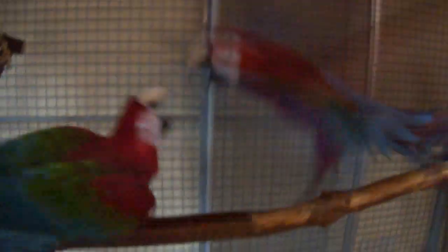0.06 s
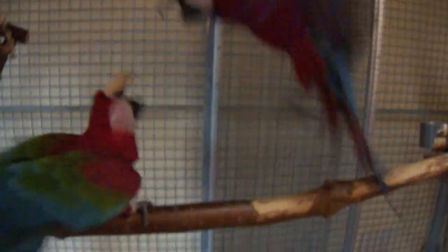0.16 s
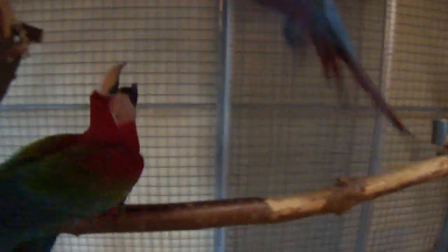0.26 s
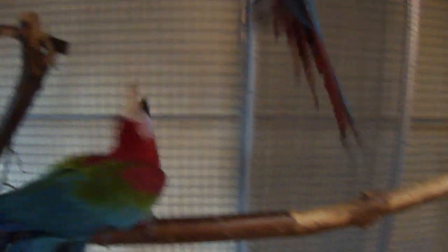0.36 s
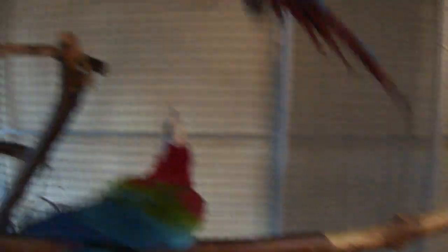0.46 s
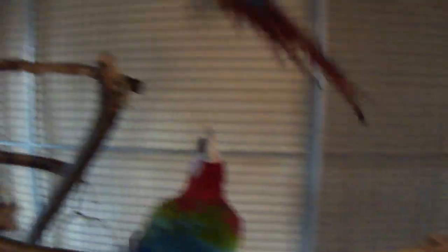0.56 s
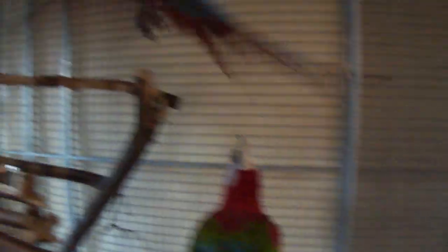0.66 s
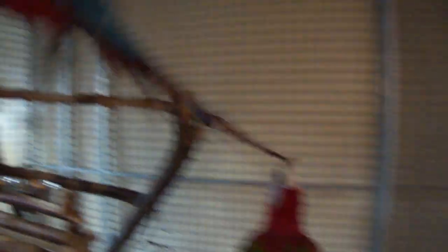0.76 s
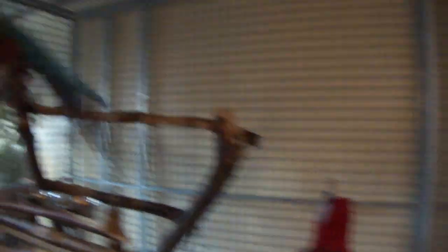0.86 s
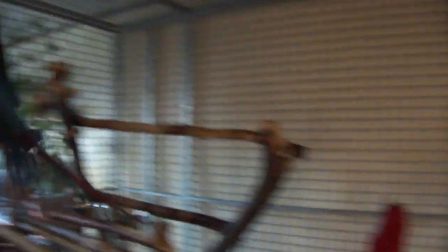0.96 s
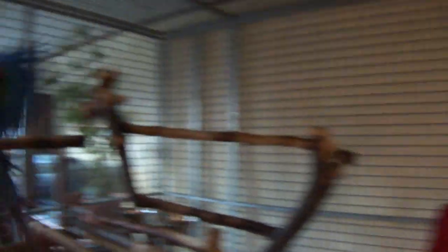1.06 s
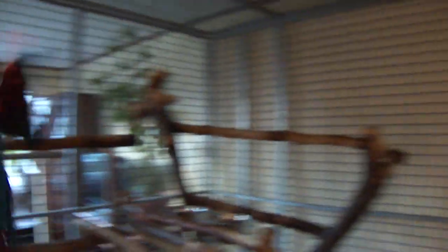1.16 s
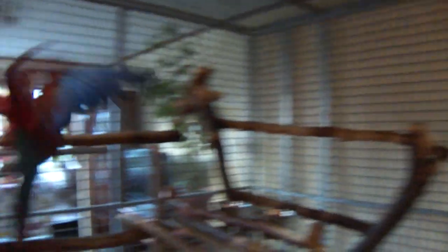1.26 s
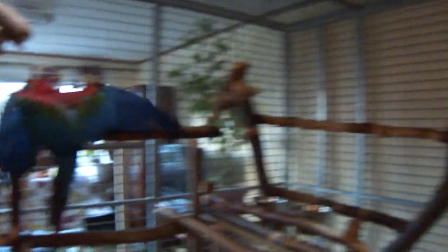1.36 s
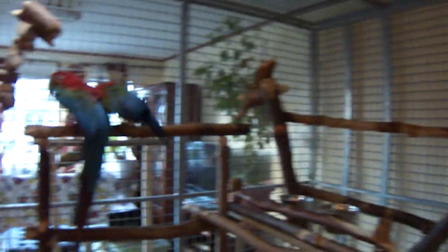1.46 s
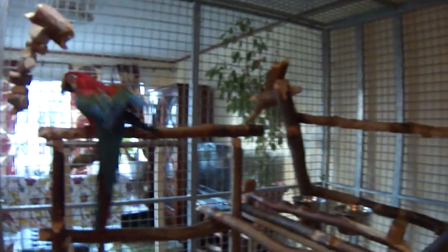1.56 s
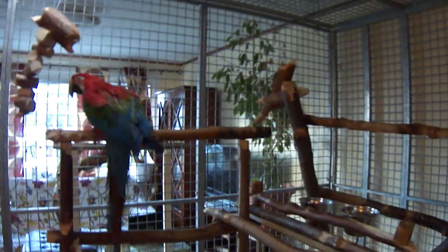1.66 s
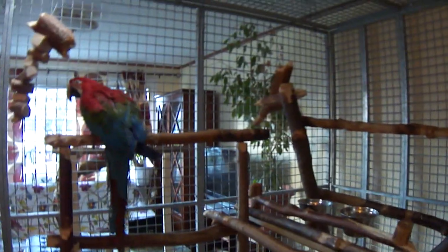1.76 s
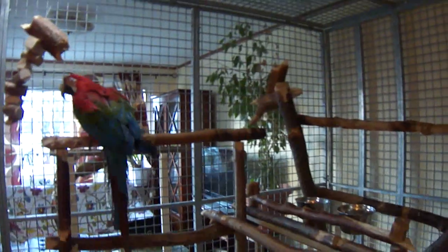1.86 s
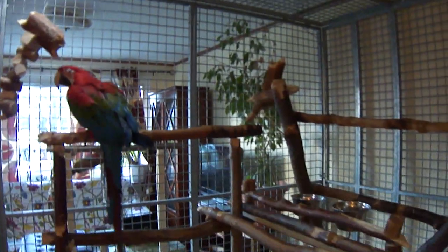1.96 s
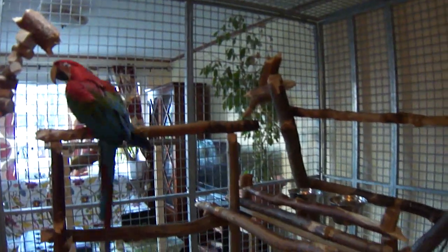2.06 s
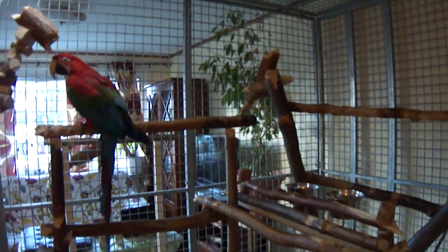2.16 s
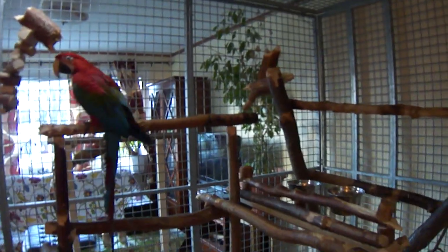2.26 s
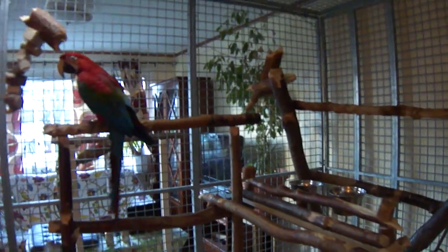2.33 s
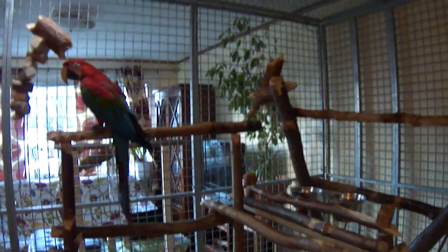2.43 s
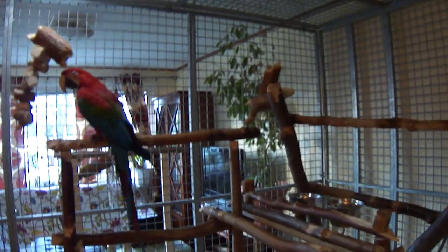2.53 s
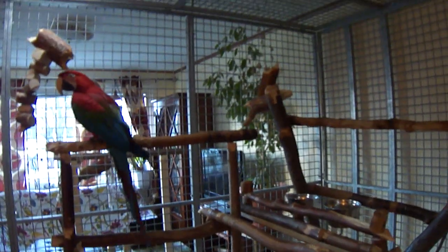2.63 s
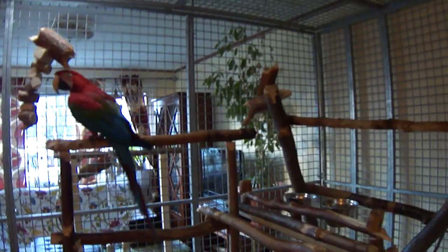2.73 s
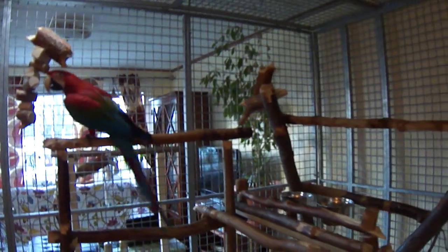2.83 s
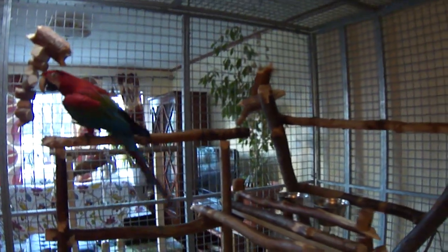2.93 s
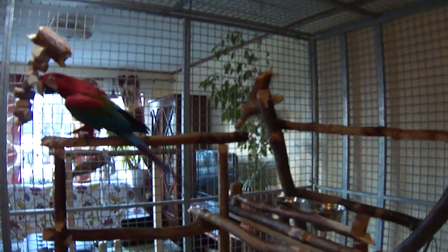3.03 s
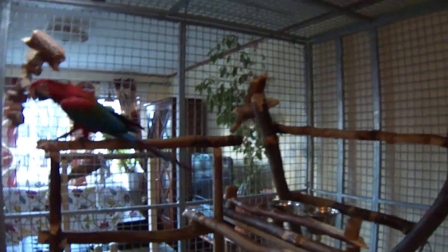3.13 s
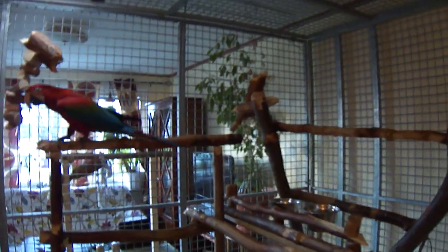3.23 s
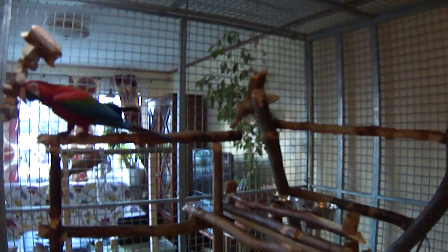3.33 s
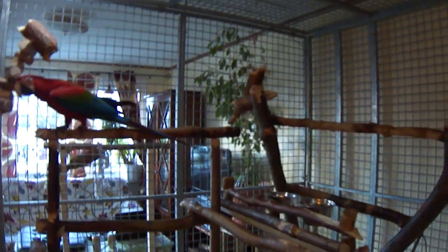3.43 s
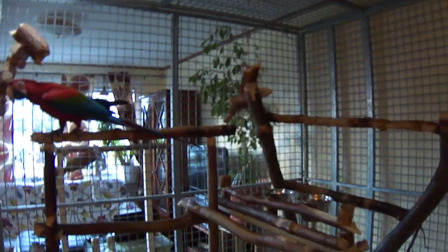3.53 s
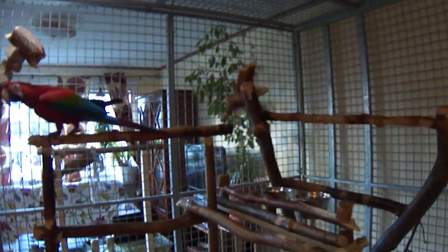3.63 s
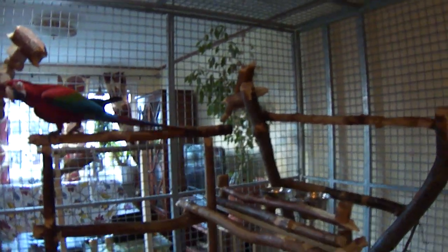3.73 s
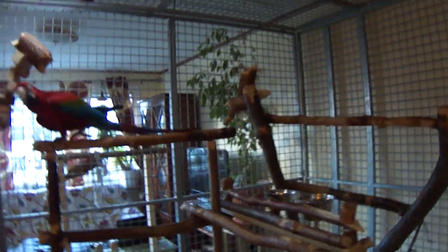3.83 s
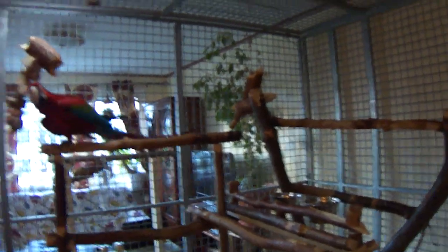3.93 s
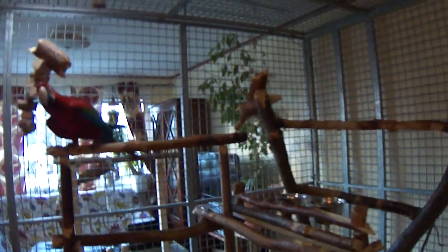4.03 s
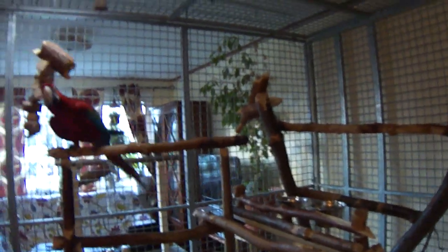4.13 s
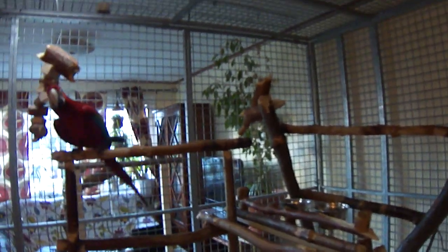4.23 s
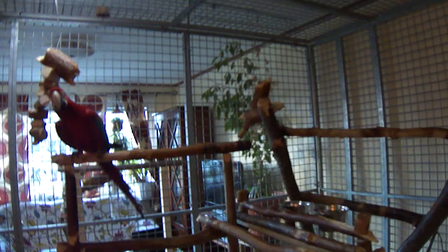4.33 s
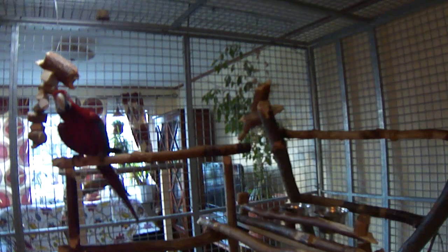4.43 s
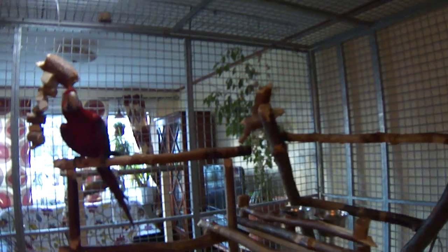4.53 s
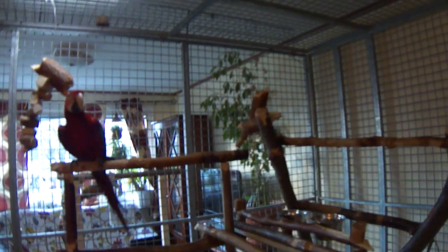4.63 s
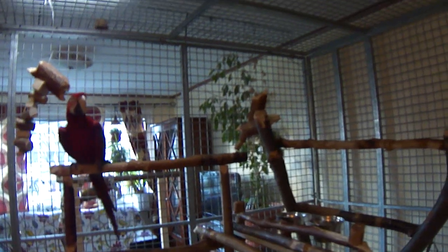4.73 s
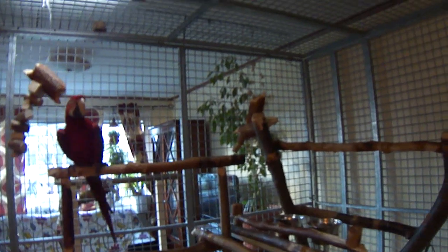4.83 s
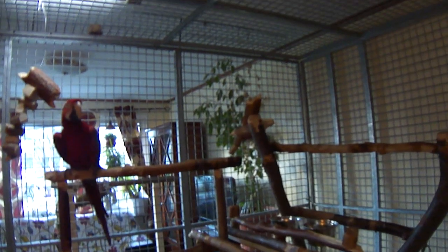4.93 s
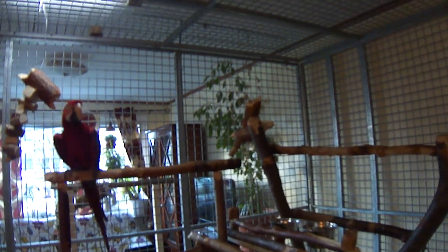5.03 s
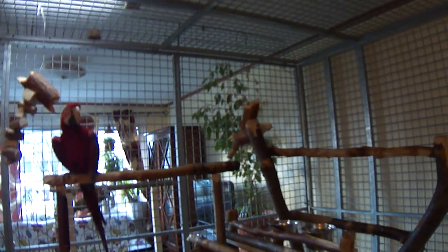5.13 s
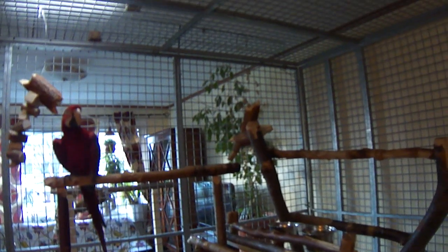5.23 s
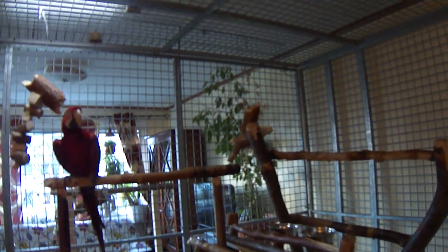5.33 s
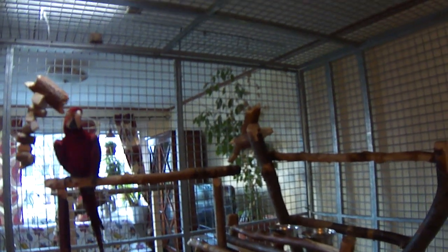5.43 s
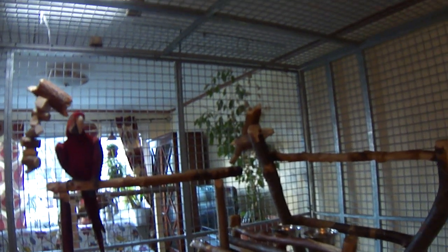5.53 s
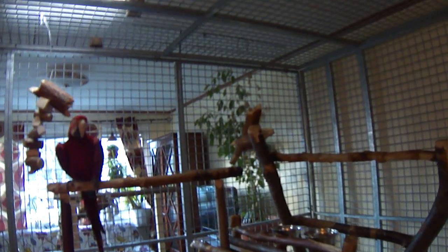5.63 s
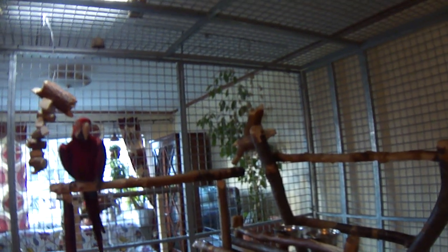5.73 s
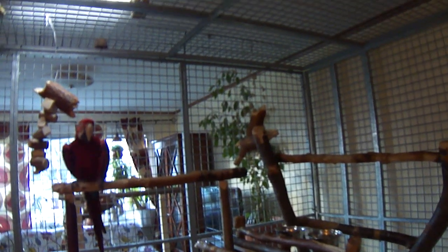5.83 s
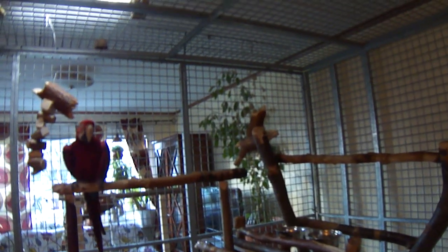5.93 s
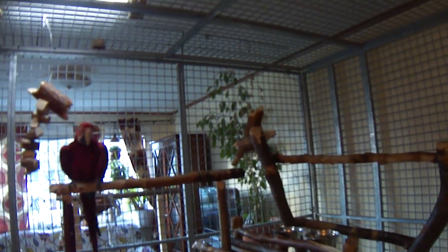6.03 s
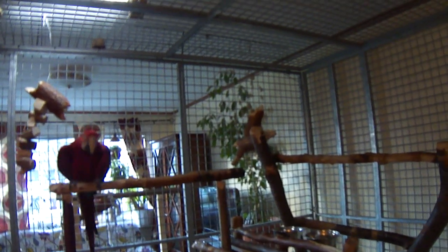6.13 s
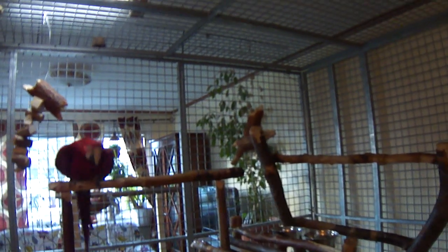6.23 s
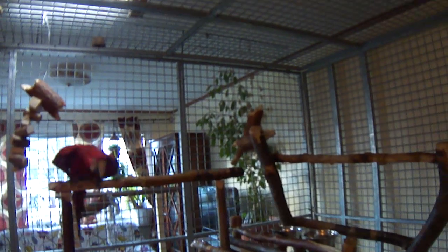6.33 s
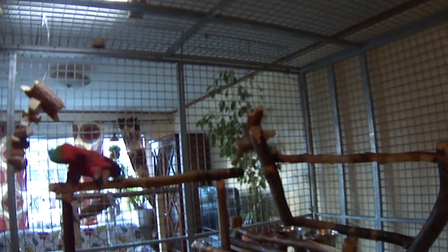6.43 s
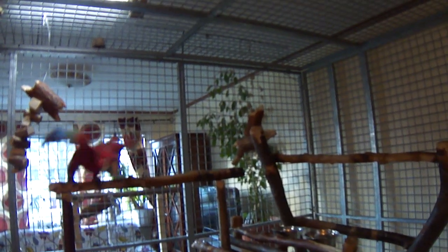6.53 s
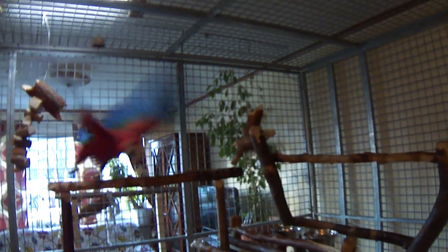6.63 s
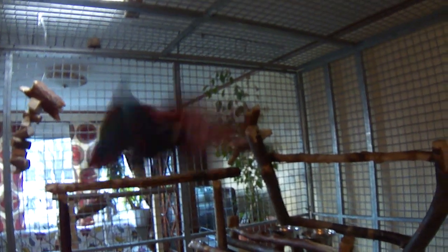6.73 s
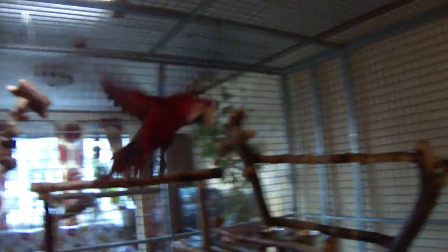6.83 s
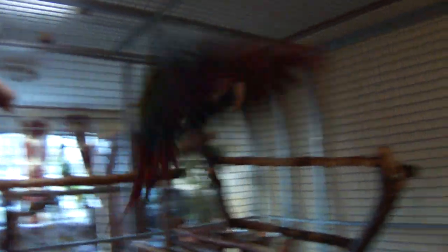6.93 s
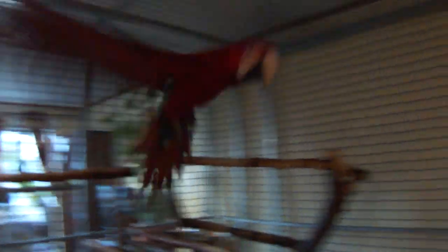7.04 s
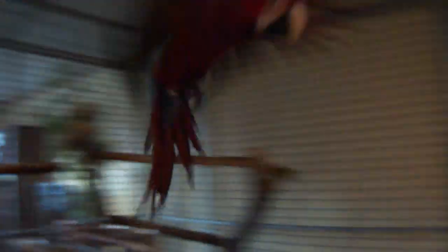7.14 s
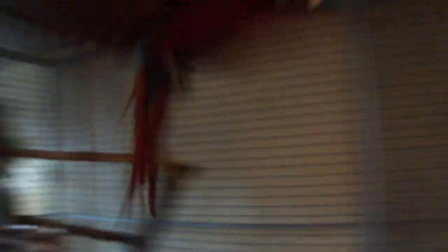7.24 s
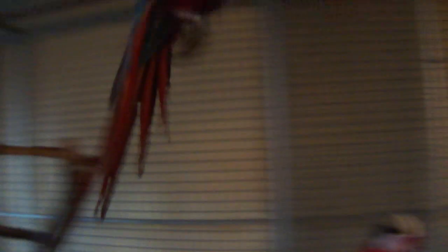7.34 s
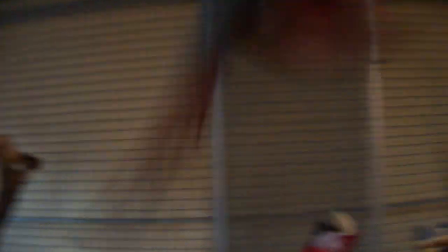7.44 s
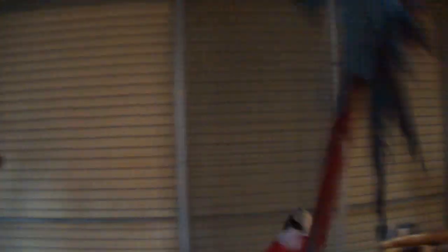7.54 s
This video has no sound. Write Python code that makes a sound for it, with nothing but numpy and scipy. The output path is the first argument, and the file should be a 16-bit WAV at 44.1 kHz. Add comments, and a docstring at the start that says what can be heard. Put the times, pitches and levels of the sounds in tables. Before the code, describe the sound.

In an indoor aviary, heavy feathery wing beats, a knocking landing on wood, sparse taps and faint rustles, then another close, buffeting flight.

```python
"""Parrot flying in an aviary

A large parrot beats its wings close by, lands, scrabbles along wooden perches and flies back.
Wing beats are swells of rushing, hissing noise, with feather snaps and low gusts at the microphone.
Claws and beak are short bursts of clicks that make wood resonate. Room echoes and a steady hush
surround them, and a gain control turns loud peaks down."""
import sys
import numpy as np
from scipy import signal
from scipy.io import wavfile

SR = 44100
rng = np.random.default_rng(int(sys.argv[2]) if len(sys.argv) > 2 else 0)


def file_out(sig):
    """Save sig as 16-bit WAV at sys.argv[1]."""
    # one column per channel
    cols = np.atleast_2d(sig).T
    # limit, then scale
    lim = np.clip(cols, -1, 1)
    pcm = np.round(lim * 32767).astype(np.int16)
    wavfile.write(sys.argv[1], SR, pcm)


N = 334719   # length in samples

# Levels in the tables are those before the room echoes and the gain control.
# colour of the room's hush: f/Hz, relative level/dB per Hz
HUSH_COLOUR = [(22, -42), (65, -23), (280, -7), (700, -7), (1540, -9), (4000, -19), (12000, -27.5)]
# claws and beak strike and skid on wood; the last row is a wing slap, given the same modes:
# t/s, peak level/dB, centre f/Hz, bite/s, skid/s, scratch level above the body of the sound/dB
PERCH_KNOCKS = [(.005, -37, 1420, 0.0013, 0.36, -1), (1.013, -21, 1990, 0.0094, 0.02, -17),
                (1.155, -19.5, 1670, 0.0076, 0.0096, -32), (1.2, -25.5, 990, 0.013, 0.021, -26),
                (1.244, -24.5, 905, 0.0075, 0.077, -11), (1.309, -19.5, 1890, 0.0057, 0.011, -12),
                (1.334, -28, 895, .005, 0.011, -20), (1.372, -25, 1360, 0.0077, 0.031, -26),
                (1.42, -28, 1040, 0.015, 0.025, -26), (1.492, -26.5, 1200, 0.013, 0.07, -9),
                (1.605, -29, 1240, 0.0054, 0.017, -21), (1.65, -27, 1420, 0.006, 0.018, -33),
                (1.927, -23.5, 1144, .004, 0.12, -33), (1.945, -25.5, 1470, .01, 0.047, -20),
                (1.982, -21.5, 970, 0.0083, 0.026, -16.5), (2.049, -32, 815, 0.0049, 0.033, -17),
                (2.108, -25.5, 970, 0.013, 0.028, -22), (2.166, -20.5, 1300, 0.0054, 0.033, -27),
                (2.208, -23.5, 1020, 0.006, 0.009, -19), (2.224, -26.5, 1540, 0.0051, 0.038, -8),
                (2.506, -30.5, 1440, 0.0064, 0.034, -21), (2.54, -34.5, 2200, 0.011, 0.034, -15.5),
                (2.643, -38.5, 2760, 0.005, 0.043, -33), (2.799, -37, 1650, 0.013, 0.061, -12),
                (2.874, -38.5, 1460, 0.015, 0.03, -11), (3.03, -46.5, 1790, 0.027, 0.1, -19),
                (3.174, -35, 1660, 0.0032, 0.046, -27), (4.262, -32, 1980, 0.0057, 0.016, -20),
                (4.276, -30, 1040, 0.01, 0.091, -15.5), (4.36, -30, 2300, 0.0058, 0.028, -9.5),
                (4.365, -27, 740, 0.0035, 0.023, -27), (4.449, -30, 1270, 0.014, 0.011, -37),
                (4.473, -30, 1000, 0.0055, 0.024, -37), (4.559, -41, 1770, 0.0066, 0.019, -30),
                (7.313, -17, 2500, 0.0085, 0.0053, -23)]
# claws and beak tap the thin far perch, same columns
THIN_PERCH_TAPS = [(3.869, -38, 1620, 0.004, 0.024, -30), (3.889, -32, 1640, 0.014, 0.027, -27),
                   (4.09, -43.5, 2200, 0.012, 0.049, -26), (4.12, -37, 2290, 0.0053, 0.027, -8),
                   (6.078, -37, 1290, 0.0094, 0.032, -13), (6.569, -40, 2980, 0.0049, 0.061, -7),
                   (6.593, -37, 2980, 0.0035, 0.026, -9), (6.653, -27, 2900, 0.0041, 0.039, -20)]
# modes (natural tones) of the perches: f/Hz, width/Hz, level/dB
PERCH_MODES = [(264, 125, 2), (425, 125, 3.5), (630, 216, 5), (817, 364, 4), (1053, 305, 5.5),
               (1235, 330, 3), (1497, 300, 0), (1704, 235, 1.5), (1953, 250, 3), (2210, 240, 1),
               (2540, 335, 2.5), (2914, 250, 2), (3270, 330, 1), (3720, 320, 0), (4050, 500, -3),
               (4840, 1100, -4)]
# modes of the thin far perch: f/Hz, width/Hz, level/dB
THIN_PERCH_MODES = [(784, 200, 1.5), (1074, 120, 3), (1430, 200, 0.5), (1740, 144, 0.5), (2236, 390, -2),
                    (2836, 130, 1), (3130, 160, -3.5), (3610, 300, -1.5), (4350, 170, -2.5),
                    (5050, 260, -3), (5600, 270, -1)]
# spans of stirred air, which settles afterwards: start t/s, end t/s
STIRRED_SPANS = [(0.051, 0.82), (6.654, 9)]
# wing beats, timed where the wing catches the air: t/s, catch level/dB, sweep level/dB, sweep fall/s,
# feather hiss level above the rush/dB, puff level/dB, downwash level/dB, rumble level/dB
WING_BEATS = [(0.067, -35, -35, 0.84, -0.5, -44, -38, -51), (0.265, -24, -27, 0.064, -9, -31.5, -30, -43),
              (0.466, -31.5, -30.5, 0.074, -4, -32, -31, -48),
              (0.675, -29.5, -32, 0.086, -3.5, -48.5, -34, -61),
              (0.853, -37.5, -29.5, 0.054, -3.5, -43, -35, -45),
              (1.029, -42, -42, 0.03, -8, -56, -41.5, -52), (6.668, -45, -41, 0.56, 3, -57, -41.5, -72),
              (6.834, -34.5, -35, 0.38, -3.5, -46, -37, -77), (7.055, -34.5, -34, 0.17, -2, -33, -37, -56),
              (7.251, -35, -32.5, 0.17, 1, -31, -25.5, -42),
              (7.451, -28.5, -39, 0.25, 0.5, -27.5, -32.5, -41.5)]
# colours of the rushing air, the gusts and their rumble: f/Hz, relative level/dB per Hz
RUSH_COLOUR = [(220, -5), (600, 4), (900, 3), (1800, 1.5), (6000, -14), (8000, -30)]
GUST_COLOUR = [(100, -10), (260, 4.5), (450, 2.5), (800, 0), (1200, -7)]
RUMBLE_COLOUR = [(20, 0), (40, -16), (160, 3)]
# feathers snapping taut: t/s, peak level/dB, centre f/Hz
FEATHER_SNAPS = [(0.19, -40, 1330), (0.296, -15.5, 600), (0.895, -17, 1030), (7.509, -21, 576)]
# eddies that thump the microphone: t/s, peak level/dB, swing f/Hz, number of swings
EDDY_THUMPS = [(0.906, -20, 332, 1.9), (7.311, -23, 564, 7.7), (7.326, -10, 251, 1.8),
               (7.337, -9.5, 301, 1.6), (7.377, -12.5, 245, 1.1)]
# faint feathery rustle while the bird sits: t/s, level/dB
SITTING_RUSTLE = [(1.901, -54), (2.7, -68), (4.1, -56.5), (4.7, -65), (5.8, -76), (6.4, -62), (6.65, -49.5)]

HUSH_DB = -53
LEAD_S = .004   # a contact begins just before it is heard
CREST_DB = 4.5   # peak of a skid above its rms
FIRST_HIT = 0.012   # strength of the opening blow, divided by the bite time in s
# light clean taps ring on one mode, hard or scratchy ones spread
RING, HARD_DB, SCRATCHY_DB, RING_SPAN_DB = .8, -12, -9, 14
THIN_RING, LUCK_DB = 3, 4   # the thin perch rings more; chance spread of the modes from blow to blow
ROOM_T60_S, TREBLE_T60_S = 0.48, 0.36   # time to fade by 60 dB
WALL_CUT_HZ, ROOM_DB = 3400, -9.5
CATCH_RISE_S, CATCH_FALL_S = 0.013, 0.051   # the wing bites
SWEEP_LAG_S, SWEEP_RISE_S = 0.028, 0.017   # then sweeps down
# a low whoomp comes with the catch
PUFF_RISE_S, PUFF_FALL_S, PUFF_HZ, PUFF_WIDTH_HZ = 0.021, 0.021, 282, 103
DOWNWASH_LAG_S, DOWNWASH_RISE_S, DOWNWASH_FALL_S = 0.075, 0.045, 0.063
STIRRED_DB, STIR_RISE_S, SETTLE_S = -42, .005, 0.4
WAKE_DB, WAKE_RUMBLE_DB = -3, -27   # buffeting between the beats, relative to the stirred air
HOLLOW_HZ, HOLLOW_WIDTH_HZ, HOLLOW_DB = 600, 120, -2   # the gusts have a hollow colour
PORT_HZ = 110   # the microphone lets little of a thump's slow push through
# the perch frame rattles while the bird lands, then fades; feathers rustle as the wings fold
RATTLE_S, RATTLE_DB, FOLD_DB, RATTLE_HOLD_S = 0.94, -34.5, -43, 0.31
RATTLE_HZ, RATTLE_RISE_S, RATTLE_FADE_S = 1490, 0.024, 0.52
# the level is that before the flip's fade
WHIP_S, WHIP_DB, WHIP_FLIP_S, WHIP_FALL_S = 7.3535, 3, .0004, 0.0008
LIMIT_DB, RELEASE_DB_PER_S, ATTACK_S = -16.5, 107, 0.0045
DUCK_SHARE = .75   # share of the excess that is taken away
CUTOFF_HZ = 10950


def from_db(db):
    """Turn decibels into a gain."""
    return 10 ** (np.asarray(db) / 20)


def rms_one(x):
    """Scale to rms 1, an average strength of one."""
    return x / np.sqrt(np.mean(x ** 2) + 1e-20)


def bandpass(x, order, low_hz, high_hz):
    """Keep the tones between two frequencies."""
    return signal.sosfilt(signal.butter(order, [low_hz, high_hz], "band", fs=SR, output="sos"), x)


def drift(rate):
    """Slow chance: noise through two one-pole low-passes at rate (Hz), spread 1."""
    r = np.exp(-80 * np.pi * rate / SR)   # one step is 40 samples
    noise = rng.standard_normal(N // 40 + 2002)
    slow = signal.lfilter([1], [1, -2 * r, r * r], noise)[2000:]
    return np.interp(np.arange(N) / 40, np.arange(len(slow)), rms_one(slow))


def grains(per_s, spread_db):
    """Random clicks of very uneven size."""
    size_db = spread_db * np.minimum(rng.exponential(1, N), 5)
    sizes = from_db(size_db) * rng.choice([-1, 1], N)
    return sizes * (rng.random(N) < per_s / SR)


def resonate(x, hz, width_hz):
    """One resonance, gain 1 on top."""
    r = np.exp(-np.pi * width_hz / SR)
    top = [(1 - r * r) / 2, 0, (r * r - 1) / 2]
    return signal.lfilter(top, [1, -2 * r * np.cos(2 * np.pi * hz / SR), r * r], x + 1e-18)


def coloured(spectrum, source, patchy_db, rate):
    """Half-octave bands of a source, each with its level and its own flicker; rms 1."""
    points, out = np.array(spectrum), 0
    octaves = np.log2(points[-1, 0] / points[0, 0])
    edges = points[0, 0] * 2 ** np.arange(0, octaves, .5)
    for k, (low, high) in enumerate(zip(edges, edges[1:])):
        middle = np.log(low * high) / 2
        level_db = np.interp(middle, np.log(points[:, 0]), points[:, 1])
        shifted = np.roll(source, 3001 * k)   # so that the bands do not move together
        band = bandpass(shifted, 2, low, min(high, .45 * SR))
        out = out + from_db(level_db + patchy_db * drift(rate)) * band
    return rms_one(out)


def hiss(low_hz, per_s):
    """Bright dense grains of feathers or scratches, fading towards the top; rms 1."""
    return rms_one(bandpass(grains(per_s, 2.9), 1, low_hz, 7000))


def swell(s, rise_s, fall_s, hold_s=0):
    """Swell to the top at s, hold and die away."""
    t = np.arange(N) / SR - s
    return np.exp(-np.where(t < 0, (t / rise_s) ** 2, np.maximum(t - hold_s, 0) / fall_s))


def pulses(table):
    """Each row swings down and up under a bell-shaped fade, wider for more swings."""
    out = np.zeros(N + 2000)
    for s, peak_db, hz, swings in table:
        turns = np.arange(2000) * hz / SR
        fade = np.exp(-((turns - .6) / swings) ** 2)
        out[round(s * SR):][:2000] -= from_db(peak_db) * np.sin(2 * np.pi * turns) * fade
    return out[:N]


def room_hush():
    """The hush of the room: noise in softly flickering bands."""
    return from_db(HUSH_DB) * coloured(HUSH_COLOUR, rng.standard_normal(N), patchy_db=1.27, rate=14.0)


def wood_slips():
    """Slipping on wood: dense uneven clicks."""
    return rms_one(grains(3000, 2.5))


def wood_scratch():
    """Bright scratching on top of the wood, also used for folding feathers."""
    return hiss(1940, 14000)


def wood(modes, x, centre_hz, semitones, luck_db, ring):
    """Dull modes, strongest near the contact's centre, weakening faster above it; chance favours some."""
    out = 0
    for k, (hz, width_hz, level_db) in enumerate(modes):
        away = 12 * np.log2(hz / centre_hz)   # semitones
        nearest = ring * np.exp(-(away / 1.14) ** 2)   # the mode right under the contact stands out
        slope = (1 + (away / semitones) ** 2) ** (-1.6 if away > 0 else -1)
        gain = (-1) ** k * from_db(level_db + luck_db[k]) * (slope + nearest)
        out = out + gain * resonate(resonate(x, hz, width_hz), hz, 1.6 * width_hz)
    return out


def contact_sounds():
    """Contacts bite, land a blow (harder if the bite is quick) and skid in dense slips; the modes ring."""
    slips, scratch = wood_slips(), wood_scratch()
    out = np.zeros(N)
    t = np.arange(SR // 4) / SR
    contacts = [(PERCH_MODES, RING, *row) for row in PERCH_KNOCKS]
    contacts += [(THIN_PERCH_MODES, THIN_RING, *row) for row in THIN_PERCH_TAPS]
    chances = rng.random((len(contacts), len(PERCH_MODES) + 1))
    for contact, chance in zip(contacts, chances):
        modes, ring, s, level_db, hz, bite_s, skid_s, scratch_db = contact
        part = out[round((s - LEAD_S) * SR):][:len(t)]
        start = int(chance[-1] * (N - len(t)))   # a random stretch of slips and scratch
        skid = np.exp(-(np.maximum(t - bite_s, 0) / max(skid_s, .004)) ** 0.87)
        push = np.minimum(t / bite_s, 1) * skid
        blows = slips[start:][:len(t)] * push
        blows[round(bite_s * SR)] += FIRST_HIT / bite_s
        margins_db = np.array([HARD_DB - level_db, SCRATCHY_DB - scratch_db])
        clean = np.prod(np.clip(margins_db / RING_SPAN_DB, 0, 1))
        body = wood(modes, blows, hz, semitones=15.7, luck_db=LUCK_DB * chance, ring=ring * clean)
        body *= np.sqrt(np.sum(push ** 2) / np.sum(body ** 2))
        scrape = from_db(scratch_db) * push * scratch[start:][:len(t)]
        part += (from_db(level_db - CREST_DB) * (body + scrape))[:len(part)]
    return out


def aviary(x):
    """Dense echoes from walls and mesh: dying noise whose treble dies sooner."""
    t = np.arange(int(.7 * SR)) / SR
    low = signal.sosfilt(signal.butter(1, WALL_CUT_HZ, fs=SR, output="sos"), rng.standard_normal(len(t)))
    bright = 0.47 * rng.standard_normal(len(t))
    echoes = low * from_db(-60 * t / ROOM_T60_S) + bright * from_db(-60 * t / TREBLE_T60_S)
    echoes *= np.minimum(t / 0.02, 1)   # the echoes build up over 20 ms
    return signal.oaconvolve(x, echoes / np.sqrt(np.sum(echoes ** 2)))[:N]


def beats():
    """Each beat is a catch and a sweep in the air, a puff and a later downwash; powers add."""
    power = np.zeros((5, N))   # rush, feather hiss, puff, buffeting, rumble
    for s, catch_db, sweep_db, fall_s, hiss_db, puff_db, wash_db, rumble_db in WING_BEATS:
        catch = from_db(catch_db) * swell(s, CATCH_RISE_S, CATCH_FALL_S)
        sweep = from_db(sweep_db) * swell(s + SWEEP_LAG_S, SWEEP_RISE_S, fall_s)
        rush = np.hypot(catch, sweep)
        puff = from_db(puff_db) * swell(s, PUFF_RISE_S, PUFF_FALL_S)
        wash = swell(s + DOWNWASH_LAG_S, DOWNWASH_RISE_S, DOWNWASH_FALL_S)
        power += np.square([rush, from_db(hiss_db) * rush, puff,
                            from_db(wash_db) * wash, from_db(rumble_db) * wash])
    return np.sqrt(power)


def wing_air(rush, swish, stirred):
    """Air rushing past the wings as rough noise, with feathers sliding over each other as hiss."""
    rough = coloured(RUSH_COLOUR, grains(12000, 2.9), patchy_db=2.0, rate=12.0)
    air = np.hypot(rush, stirred) * rough
    return air + np.hypot(swish, from_db(-2.5) * stirred) * hiss(960, 20000)


def wing_gusts(puff, buffet, rumble, stirred):
    """Gusts that only the microphone feels: hollow buffeting, a low whoomp and rumble."""
    flutter = from_db(0.99 * drift(51))
    noise = coloured(GUST_COLOUR, rng.standard_normal(N), patchy_db=-3.0, rate=5.9)
    gust = np.hypot(buffet, from_db(WAKE_DB) * stirred) * flutter * noise
    gust += from_db(HOLLOW_DB) * resonate(gust, HOLLOW_HZ, HOLLOW_WIDTH_HZ)
    narrow = resonate(rng.standard_normal(N), PUFF_HZ, PUFF_WIDTH_HZ)
    whoomp = rms_one(resonate(narrow, PUFF_HZ, 2 * PUFF_WIDTH_HZ))
    deep = coloured(RUMBLE_COLOUR, rng.standard_normal(N), patchy_db=4.5, rate=12)
    return gust + puff * whoomp + np.hypot(rumble, from_db(WAKE_RUMBLE_DB) * stirred) * deep


def wings():
    """Wing beats over stirred air: returns the sound in the air, and the gusts at the microphone."""
    stirred = from_db(STIRRED_DB) * sum(swell(start, STIR_RISE_S, SETTLE_S, end - start)
                                        for start, end in STIRRED_SPANS)
    rush, swish, puff, buffet, rumble = beats()
    return wing_air(rush, swish, stirred), wing_gusts(puff, buffet, rumble, stirred)


def feather_snaps():
    """Feathers snapping taut: very short swings of pressure."""
    return pulses([(*snap, .79) for snap in FEATHER_SNAPS])


def eddy_thumps():
    """Eddies thump the microphone: short swings with their slowest part filtered out."""
    high_pass = signal.butter(2, PORT_HZ, "high", fs=SR, output="sos")
    return signal.sosfilt(high_pass, pulses(EDDY_THUMPS))


def landing_rattle():
    """Slips shake the wood of the perch frame, while folding feathers rustle along."""
    shaking = from_db(1.5 * drift(17)) * wood_slips()
    no_luck = np.zeros(len(PERCH_MODES))
    rattle = rms_one(wood(PERCH_MODES, shaking, RATTLE_HZ, semitones=20.8, luck_db=no_luck, ring=0.24))
    envelope = swell(RATTLE_S, RATTLE_RISE_S, RATTLE_FADE_S, RATTLE_HOLD_S)
    return envelope * (from_db(RATTLE_DB) * rattle + from_db(FOLD_DB) * wood_scratch())


def sitting_rustle():
    """Feathers of the sitting bird rustle faintly: hiss that follows a level table, silent outside it."""
    t = np.arange(N) / SR
    level_db = np.interp(t, *np.transpose(SITTING_RUSTLE), left=-np.inf, right=-np.inf)
    return from_db(level_db) * hiss(410, 30000)


def whip():
    """One steep flip from suction to pressure."""
    t = np.arange(N) / SR - WHIP_S
    return from_db(WHIP_DB) * np.tanh(t / WHIP_FLIP_S) * np.exp(-np.abs(t) / WHIP_FALL_S)


def scene():
    """Bird and perches sound into the room; gusts and thumps arise at the microphone."""
    hush = room_hush()
    contacts = contact_sounds()
    air, gust = wings()
    near = air + feather_snaps()
    far = contacts + landing_rattle() + sitting_rustle()
    # the flights pass close, so they sound drier
    echoes = from_db(ROOM_DB) * aviary(far + from_db(-11.0) * near)
    thumps = eddy_thumps() + whip()
    return (near + far + echoes + gust + thumps + hush)[None]


def record(dry):
    """Gain control ducks after loud peaks and recovers at a steady rate; the top is cut steeply."""
    ramp = RELEASE_DB_PER_S * np.arange(N) / SR
    level_db = 20 * np.log10(np.abs(dry) + 1e-9)
    over_db = DUCK_SHARE * np.maximum(level_db - LIMIT_DB, 0)
    # the highest peak so far holds, sinking along the ramp
    held_db = np.maximum.accumulate(over_db + ramp, axis=1) - ramp
    keep = np.exp(-1 / (ATTACK_S * SR))
    duck_db = signal.lfilter([1 - keep], [1, -keep], held_db)
    top_cut = signal.ellip(12, .5, 70, CUTOFF_HZ, fs=SR, output="sos")
    return signal.sosfilt(top_cut, dry * from_db(-duck_db))


dry = scene()
out = record(dry)
file_out(out)
```